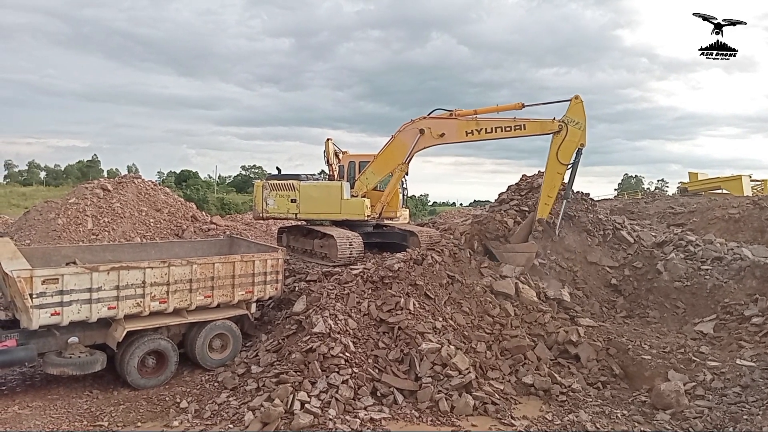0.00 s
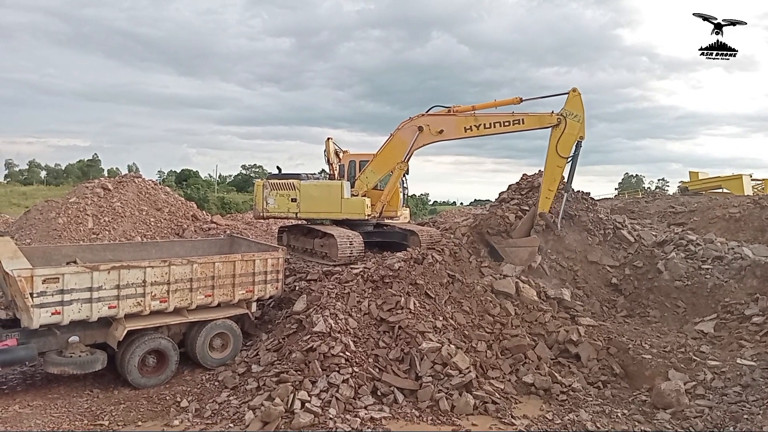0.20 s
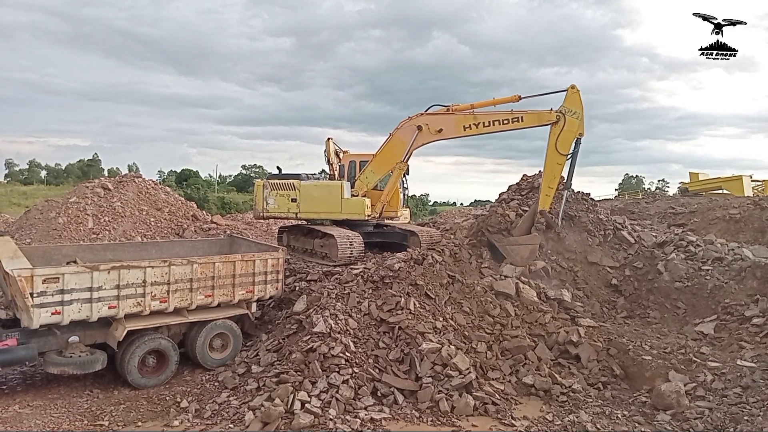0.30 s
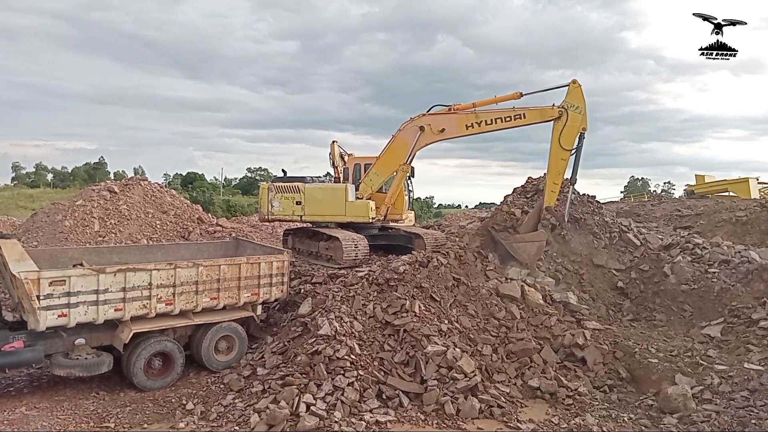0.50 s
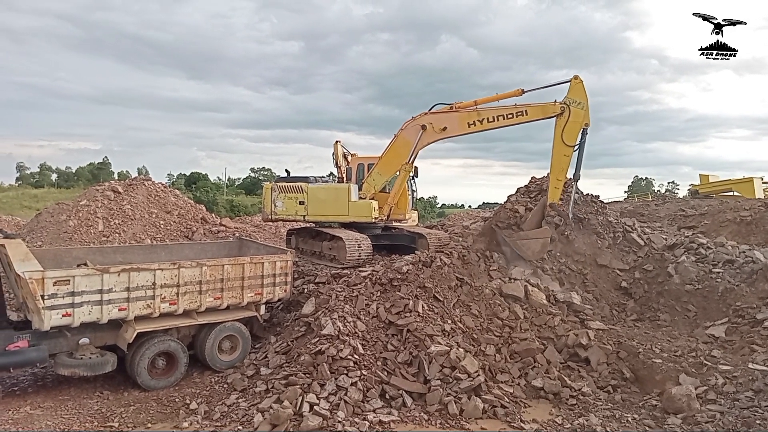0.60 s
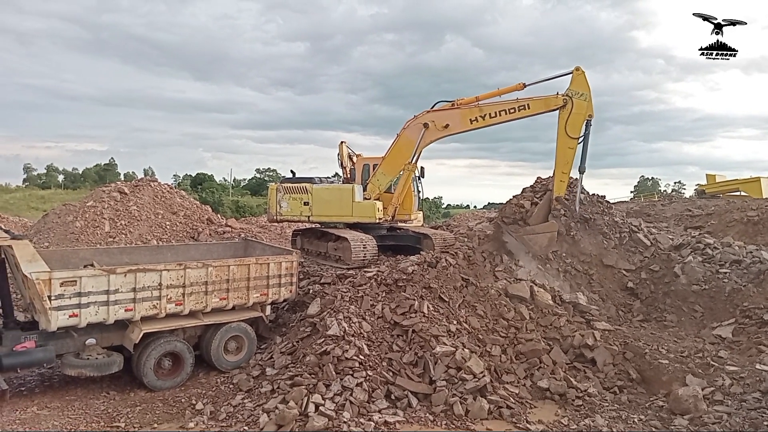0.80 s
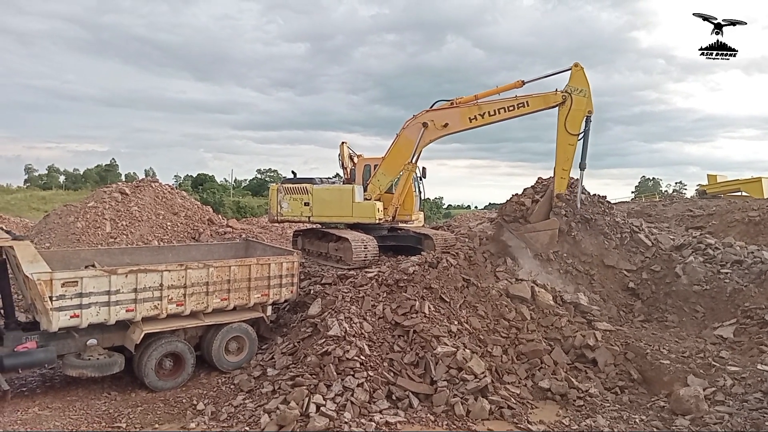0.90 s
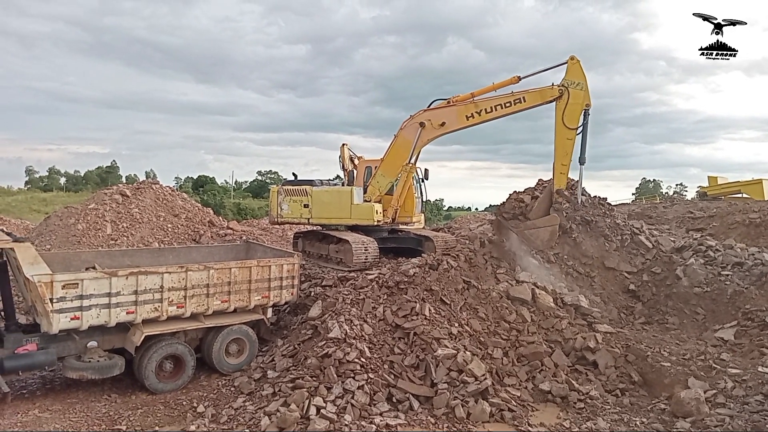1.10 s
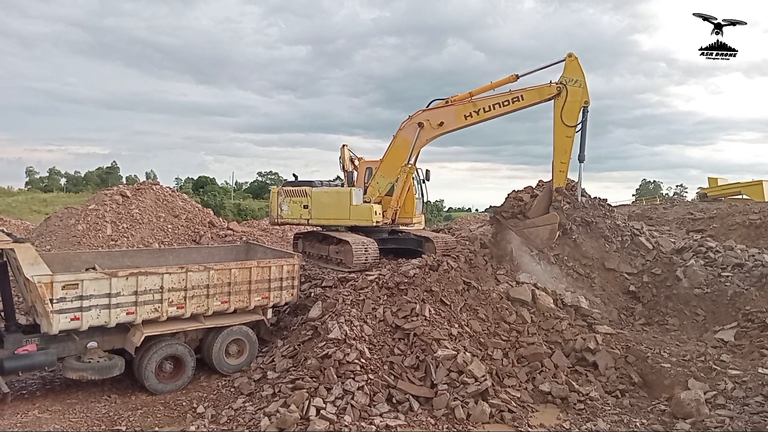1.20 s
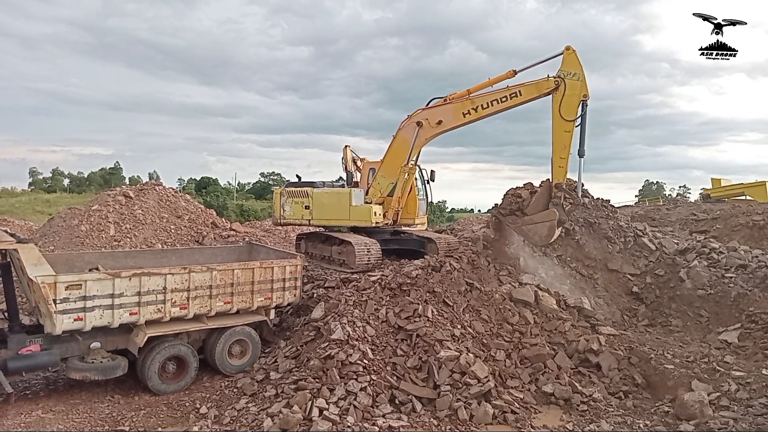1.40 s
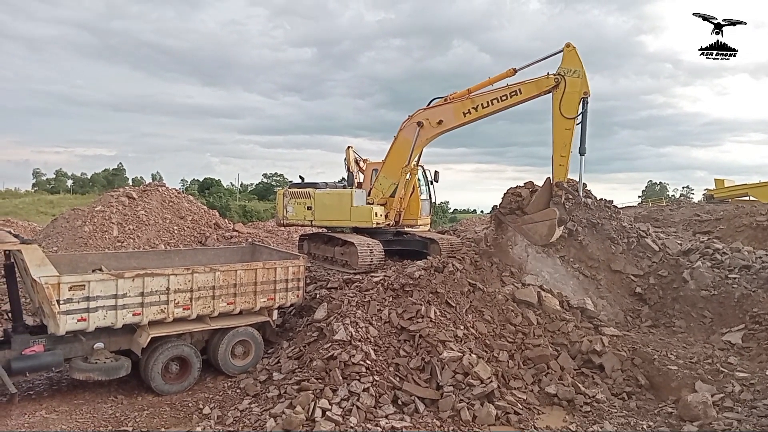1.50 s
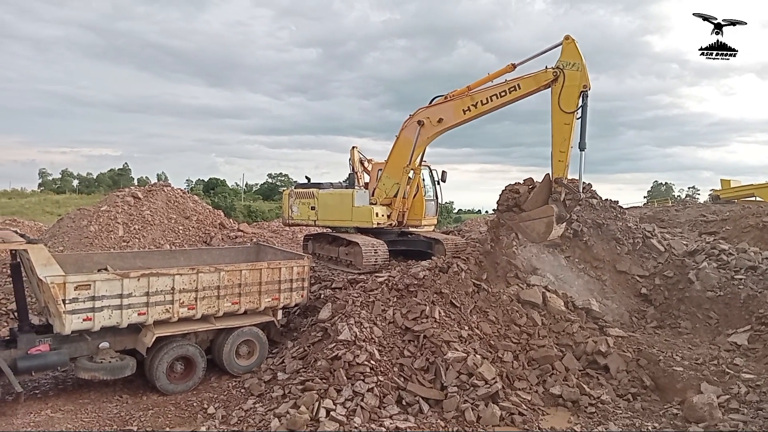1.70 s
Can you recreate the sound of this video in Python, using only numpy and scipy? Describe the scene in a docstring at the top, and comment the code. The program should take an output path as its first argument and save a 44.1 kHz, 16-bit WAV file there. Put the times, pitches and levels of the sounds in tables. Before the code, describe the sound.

Rock scraping on bucket steel, with gravel running throughout; an early ringing squeak stands out, then a sharp crunch and scattered thuds and chips follow. Distant microphone outdoors, short rocky echoes, faint engine underneath.

```python
"""An excavator lifts a bucket of broken rock at a quarry, some way off.
All through, a faint diesel hums (sines over soft noise), gravel slides and the steel grinds (random grains).
First comes a rough scrape (grains through a narrow filter), then squeaks (wavering sines), the loudest
of them near 0.24 s with the first thud (dying sine and noise). From about 0.4 s grit crunches (bursts of
grains), and from about 0.64 s chips tick too (short high rings), among more scrapes, squeaks and thuds."""
import sys
import numpy as np
from scipy import signal
from scipy.fft import rfft, irfft
from scipy.io import wavfile

SR = 44100
rng = np.random.default_rng(int(sys.argv[2]) if len(sys.argv) > 2 else 0)


def output_pcm(signal):
    """Save a mono or channel-first signal as 16-bit PCM at the path in sys.argv[1].

    Samples are clipped to [-1, 1] before scaling.
    """
    pcm = np.clip(np.atleast_2d(signal).T, -1, 1) * 32767
    wavfile.write(sys.argv[1], SR, np.round(pcm).astype(np.int16))


N = 79380
T = np.arange(N) / SR  # time of every sample, in seconds

# how much gravel runs over time: [t/s, level change/dB]
TRICKLE = [(0, 0.5), (.11, -4), (.17, 2), (.25, -1), (.36, -1.5), (.42, -0.5), (.47, -2.5), (.51, 3),
           (.56, -3), (.62, 0), (.72, -4), (.79, -4), (.95, -4.5), (1.05, -6), (1.2, -3), (1.42, -1.5),
           (1.52, 0.5), (1.64, -4), (1.8, -2.5)]

# how fast tiny slips follow each other, and how their sizes spread (below 0: a few are much smaller)
SLIPS_PER_S, SLIP_SPREAD_DB = 3600, -1.2


def from_db(db):
    """Turn decibels into a plain multiplier."""
    return 10 ** (np.asarray(db) / 20)


def rms_one(x):
    """Scale a signal to an rms (average strength) of 1."""
    return x / np.sqrt(np.mean(x ** 2) + 1e-20)


def drift(rate_hz):
    """Smooth random wandering with rms 1, made by smoothing noise."""
    r = np.exp(-2 * np.pi * rate_hz / SR)
    smooth = signal.lfilter([1], [1, -2 * r, r * r], rng.standard_normal(2 * N))
    return rms_one(smooth[N:])  # the first half lets the filter settle


def colour(x, spectrum):
    """Weight the frequencies of a signal along a smooth curve; rms 1."""
    hz, db = np.transpose(spectrum)
    f = np.maximum(np.arange(N // 2 + 1) * SR / N, 1)
    weights = from_db(np.interp(np.log(f), np.log(hz), db))
    return rms_one(irfft(rfft(x) * weights, N))


def grains(per_s, spread_db):
    """Random contacts as single clicks; a positive spread makes a few large, a negative one a few small."""
    sizes = from_db(spread_db * np.minimum(rng.exponential(1, N), 5))
    signs = rng.choice([-1, 1], N)
    return sizes * signs * (rng.random(N) < per_s / SR)


def swell(start, attack, hold, fade):
    """Rounded rise, then a fall that begins one hold time after the start."""
    rise = np.clip((T - start) / attack, 0, 1)
    fall = np.clip((T - start - hold) / fade, 0, 1)
    return np.sin(np.pi / 2 * rise) ** 2 * (1 - fall) * (1 - fall / 2)


def dying(start, t60, attack=1 / SR):
    """A blow: quick rise, and a decay by 60 dB in t60 seconds."""
    rise = np.clip((T - start) / attack, 0, 1)
    return rise * from_db(-60 * np.maximum(T - start, 0) / t60)


def rubbed(per_s, spread_db, hz, width_hz):
    """A steep-sided resonance driven by random slips."""
    edges_hz = [max(hz - width_hz / 2, 20), hz + width_hz / 2]
    sos = signal.butter(2, edges_hz, "band", fs=SR, output="sos")
    return signal.sosfilt(sos, grains(per_s, spread_db) + 1e-18)


def engine():
    """The diesel: sines at multiples of its firing rate, over the noise of exhaust rumble and open air."""
    # diesel hum: [multiple of the firing rate, rms level before wandering/dB]
    orders = [(1, -99), (2, -84), (3, -72.5), (4, -75), (8, -80)]
    # tone of exhaust rumble and open air: [f/Hz, weight/dB]
    rumble_spectrum = [(25, -33), (40, -44), (65, -24), (110, -13.5), (160, -3), (210, 3), (320, -1.5),
                       (470, -9.5), (750, -11), (1100, -9), (2500, -19), (6000, -30.5), (9500, -37),
                       (12000, -48), (15000, -49.5)]
    firing_hz, waver = 69.2, 0.0068  # the waver is a fraction of the rate
    hum_wander_db, rumble_db = 2, -64
    phase = 2 * np.pi * np.cumsum(firing_hz * (1 + waver * drift(4.7))) / SR
    hum = 0
    for multiple, db in orders:
        level = from_db(db + hum_wander_db * drift(5.5)) * np.sqrt(2)  # rms to peak
        hum = hum + level * np.sin(round(multiple) * phase + 2 * np.pi * rng.random())
    return hum + from_db(rumble_db) * colour(rng.standard_normal(N), rumble_spectrum)


def ticks(count=24):
    """Stray bits of grit hit at random and ring briefly, at pitches from a fixed set."""
    ticks_per_s, t60_s, level_db, spread_db = 400, 0.028, -76.5, 2
    low_hz, high_hz, tilt_db_per_octave = 2540, 10070, -7.5
    r = from_db(-60 / (t60_s * SR))  # how much of the ring is left after one sample
    out = 0
    for hz in np.geomspace(low_hz, high_hz, count):
        w = 2 * np.pi * hz / SR
        hits = grains(ticks_per_s / count, spread_db) + 1e-18
        ping = signal.lfilter([0, np.sin(w)], [1, -2 * r * np.cos(w), r * r], hits)
        out = out + from_db(tilt_db_per_octave * np.log2(hz / low_hz)) * ping
    return from_db(level_db) * rms_one(out)


def gravel():
    """Loose gravel runs off the bucket as grains in clumps, with pinging grit among it."""
    # tone of the gravel: [f/Hz, weight/dB]
    gravel_spectrum = [(500, -9), (1000, 14), (2000, 10), (4000, 9), (6500, 4), (8000, -10.5), (10000, -9),
                       (12000, -36)]
    level_db, grains_per_s, spread_db = -71.5, 3500, 4
    clump_db, clump_rate_hz = 1.5, 38
    clumps = from_db(clump_db * drift(clump_rate_hz))
    patter = from_db(level_db) * colour(clumps * grains(grains_per_s, spread_db), gravel_spectrum)
    return from_db(np.interp(T, *np.transpose(TRICKLE))) * (patter + ticks())


def grinding():
    """Big stones ring the bucket's low modes, smaller ones the middle, gravel the top; each mode wanders."""
    # resonances of the bucket: [f/Hz, width/Hz, rms level before the changes over time/dB]
    bucket = [(720.6, 169, -66), (827.3, 9.2, -73.5), (1236, 139, -73.5), (1632, 155, -73),
              (1877, 200, -72), (2320, 33, -81), (2753, 114, -74), (3320, 41, -80.5), (3530, 140, -76),
              (4050, 81, -79.5), (4450, 100, -79.5), (4940, 57, -83.5), (5900, 74, -87.5), (6090, 58, -84),
              (6420, 370, -88)]
    # push on the low modes over time: [t/s, level change/dB]
    heave = [(0, -4), (.2, 0), (.33, 1), (.45, 1), (.55, -1.5), (.78, 1), (.9, -1), (1.05, -1), (1.27, 3),
             (1.4, -3.5), (1.6, -4), (1.8, -4)]
    # push on the middle modes over time: [t/s, level change/dB]
    grind = [(0, 1), (.06, 0.5), (.11, -8), (.18, -5.5), (.25, -3.5), (.42, 0), (.51, 5.5), (.56, 3),
             (.62, 4), (.78, -1.5), (.93, -3.5), (1.04, -1.5), (1.1, -3), (1.22, -1.5), (1.38, -9.5),
             (1.5, -2.5), (1.62, -2), (1.68, -5), (1.8, -0.5)]
    low_below_hz, top_from_hz = 1400, 4600
    grains_per_s, spread_db = 2500, 3.5
    wander_db, wander_rate_hz = 3.5, 13.2
    steel = 0
    for hz, width_hz, db in bucket:
        if hz < low_below_hz:
            drive = heave
        elif hz < top_from_hz:
            drive = grind
        else:
            drive = TRICKLE
        wander = from_db(wander_db * drift(wander_rate_hz))
        ringing = rms_one(wander * rubbed(grains_per_s, spread_db, hz, width_hz))
        steel = steel + from_db(db + np.interp(T, *np.transpose(drive))) * ringing
    return steel


def thuds():
    """A lump lands on the pile: a low sine dies away, with noise for the grit it stirs."""
    # landing lumps: [t/s, peak level of the sine before decay and filter/dB, f/Hz]
    thud_table = [(0.23, -51.5, 416), (.595, -57, 850), (0.929, -55, 201), (0.944, -53, 227),
                  (1.036, -50.5, 565), (1.136, -46, 790), (1.215, -50, 210), (1.226, -46.5, 875),
                  (1.328, -49.5, 673), (1.498, -53, 512), (1.546, -51.5, 214)]
    decay_cycles, attack_s = 25, 0.0017  # the sine drops 60 dB in this many cycles
    grit_db, low_hz, high_hz = -9.5, 170, 1490
    out = 0
    for s, db, hz in thud_table:
        # the square root makes up for what the filter below takes off the noise
        grit = from_db(grit_db) * np.sqrt(SR / 2 / high_hz) * rng.standard_normal(N)
        knock = np.sin(2 * np.pi * hz * (T - s))
        out = out + from_db(db) * dying(s, decay_cycles / hz, attack_s) * (knock + grit)
    band = signal.butter(3, [low_hz, high_hz], "band", fs=SR, output="sos")
    return signal.sosfilt(band, out + 1e-18)


def chips():
    """Each small chip strikes with a short high ring and a crunch of grit."""
    # striking chips: [t/s, level before the ring and crunch settings/dB, ring f/Hz]
    chip_table = [(.636, -61, 9850), (.6838, -53, 8300), (.7507, -67, 7530), (.8205, -64, 8070),
                  (.841, -72, 6600), (.8669, -60, 8640), (.9867, -62, 5900), (1.0301, -56, 5600),
                  (1.1498, -60, 7500), (1.2421, -60.5, 8370), (1.4661, -53, 9300), (1.479, -63, 9700),
                  (1.491, -66, 9450), (1.524, -68, 9500), (1.553, -69, 8900), (1.5838, -55.5, 5800),
                  (1.6038, -62, 7470), (1.70, -53.5, 8400), (1.7295, -52, 8950)]
    ring_t60_s, crunch_t60_s, attack_s = 0.025, 0.027, 0.0019
    ring_db, crunch_db, grains_per_s = -3, -4, 6000
    rings, crunch = 0, 0
    for s, db, hz in chip_table:
        tone = np.sin(2 * np.pi * hz * (T - s))
        grit = rms_one(grains(grains_per_s, SLIP_SPREAD_DB))
        rings = rings + from_db(db) * dying(s, ring_t60_s, attack_s) * tone
        crunch = crunch + from_db(db) * dying(s, crunch_t60_s, attack_s) * grit
    band = signal.butter(4, [3550, 9020], "band", fs=SR, output="sos")
    return signal.sosfilt(band, from_db(ring_db) * rings + from_db(crunch_db) * crunch)


def crunches():
    """Stone crushes grit: a burst of coarse grains starts at once and crumbles on, ever smaller."""
    # bursts: [t/s, rms level at first/dB, time to fall 60 dB/s, lowest f/Hz, highest f/Hz]
    crunch_table = [(0.393, -65, 0.15, 3020, 6540), (.505, -76.5, 0.12, 5000, 10000),
                    (0.593, -54.5, .1, 2000, 4140), (0.6105, -48, 0.13, 1600, 3970),
                    (0.682, -60, 0.071, 5420, 7200), (.685, -56, 0.084, 1400, 3600),
                    (.821, -65, 0.034, 4470, 8750), (1.031, -69.5, 0.049, 3480, 6800),
                    (1.173, -53, 0.047, 900, 2550), (1.266, -67, 0.19, 4170, 6200),
                    (1.468, -66.5, 0.12, 2650, 7400), (1.521, -68, 0.061, 2600, 6700),
                    (1.584, -56.5, 0.042, 2450, 6800), (1.611, -61, 0.038, 1380, 2980),
                    (1.667, -68, 0.083, 5840, 7000), (1.729, -55.5, 0.037, 1780, 7200)]
    grains_per_s, spread_db, attack_s = 1600, 3, 0.0029
    out = 0
    for s, db, t60, low_hz, high_hz in crunch_table:
        band = signal.butter(5, [low_hz, max(high_hz, low_hz + 100)], "band", fs=SR, output="sos")
        envelope = dying(s, t60, attack_s)
        burst = signal.sosfilt(band, grains(grains_per_s, spread_db) * envelope + 1e-18)
        out = out + from_db(db) * rms_one(burst) * np.sqrt(np.mean(envelope ** 2))
    return out


def scrapes():
    """Stone slides on steel: uneven slips that never settle drive one resonance."""
    # slides: [t/s, length of the fade (it begins after half as long)/s, f/Hz, width/Hz, full rms level/dB]
    scrape_table = [(0.04, 0.054, 1910, 79, -62), (0.306, 0.087, 1890, 96, -66.5),
                    (.354, 0.026, 2060, 60, -63.5), (0.414, 0.029, 1970, 198, -61.5),
                    (0.468, 0.036, 1780, 112, -57), (.494, 0.048, 5800, 300, -72.5),
                    (0.61, 0.031, 1493, 263, -49.5), (0.584, .025, 6900, 500, -76.5),
                    (0.629, 0.034, 1940, 120, -58.5), (0.717, 0.048, 719, 30, -58),
                    (.716, 0.096, 3250, 60, -70), (0.705, 0.18, 1878, 110, -64),
                    (0.765, 0.053, 2092, 68.6, -62.5), (0.863, 0.034, 3890, 161, -65.5),
                    (0.884, 0.058, 2125, 46.4, -63.5), (0.941, 0.048, 1622, 69, -64.5),
                    (1.254, .066, 5900, 153, -67.5), (1.262, 0.028, 6165, 151, -60.5),
                    (1.267, 0.04, 4905, 139, -67.5), (1.27, 0.042, 4430, 150, -69),
                    (0.984, 0.035, 5930, 500, -77), (1.472, .086, 2750, 377, -68),
                    (1.569, 0.027, 3570, 403, -58.5), (1.783, 0.017, 3520, 250, -61.5)]
    edge_s = 0.0055
    out = 0
    for s, length, hz, width_hz, db in scrape_table:
        envelope = swell(s, edge_s, length / 2, length)
        rub = rubbed(SLIPS_PER_S, SLIP_SPREAD_DB, hz, width_hz) * envelope
        out = out + from_db(db) * rms_one(rub) * np.sqrt(np.mean(envelope ** 2))
    return out


def squeaks():
    """Stone sticks and slips on steel: friction locks onto one mode, which sings until it lets go."""
    # squeaks: [t/s, time from start to fade/s, fade/s, f/Hz, peak level before envelope and flutter/dB]
    squeak_table = [(0.214, 0.014, 0.0074, 4010, -51.5), (0.235, 0.024, 0.028, 837, -30.5),
                    (0.282, 0.0082, .008, 775.4, -40.5), (0.288, .014, 0.0076, 913, -46.5),
                    (0.303, 0.0055, 0.05, 833, -55.5), (0.5909, 0.022, 0.0016, 1429, -39),
                    (0.653, 0.011, 0.0099, 5025, -56), (0.7, 0.011, 0.01, 3237, -41.5),
                    (0.705, 0.015, 0.016, 725, -51.5), (0.757, .007, 0.013, 3340, -54.5),
                    (0.852, 0.0072, 0.017, 3436, -50), (1.131, 0.018, 0.005, 2043, -48),
                    (1.236, 0.0081, 0.0096, 3970, -55.5), (1.563, 0.0072, 0.026, 3486, -51),
                    (1.785, 0.011, .010, 2715, -48)]
    attack_s, flutter_db = 0.0084, 0.6
    waver, waver_rate_hz = 0.0032, 41  # the waver is a fraction of the pitch
    out = 0
    for s, hold, fade, hz, db in squeak_table:
        pitch_hz = hz * (1 + waver * drift(waver_rate_hz))
        tone = np.sin(2 * np.pi * np.cumsum(pitch_hz) / SR)
        level = from_db(db + flutter_db * drift(waver_rate_hz))
        out = out + level * swell(s, attack_s, hold, fade) * tone
    return out


def quarry(x):
    """Scattered echoes off the rock heaps: the sound smeared by a short, dying noise."""
    echo_db, t60_s, delay_s = -8.5, 0.12, 0.0052
    tail = rng.standard_normal(N) * dying(delay_s, t60_s)
    tail = tail / np.sqrt(np.sum(tail ** 2))
    return from_db(echo_db) * signal.fftconvolve(x, tail)[:N]


def scene():
    """The shifting load with its echoes, over the grinding, the gravel and the engine."""
    background = engine() + gravel() + grinding()
    stones = thuds() + chips() + crunches() + scrapes()
    singing = squeaks()
    # squeaks go into the echoes 9 dB weaker than the other stone sounds
    echoes = quarry(stones + from_db(-9) * singing)
    return (background + stones + singing + echoes)[None]


def record(dry):
    """Cut the top steeply above 15300 Hz."""
    low_pass = signal.cheby1(10, 0.1, 15300, fs=SR, output="sos")  # ripple 0.1 dB
    return signal.sosfilt(low_pass, dry)


dry = scene()
out = record(dry)
output_pcm(out)
```